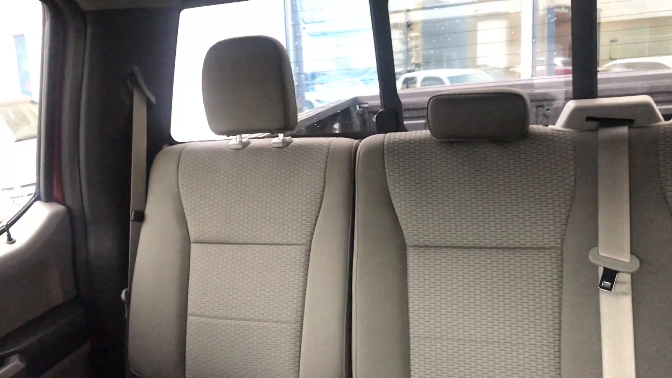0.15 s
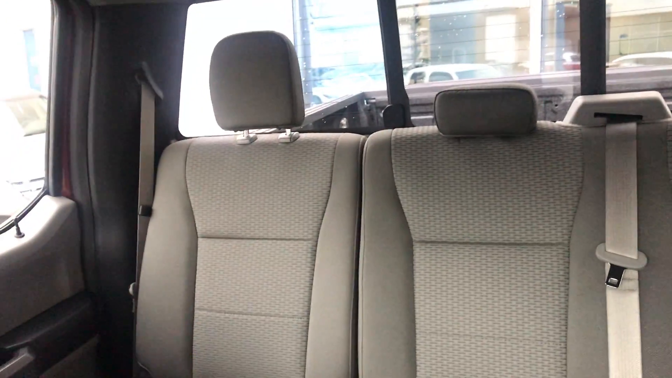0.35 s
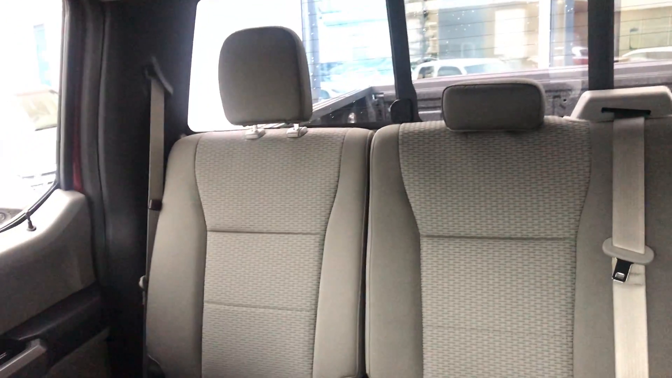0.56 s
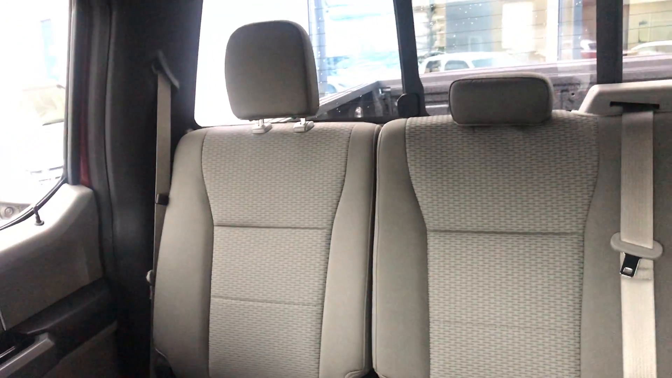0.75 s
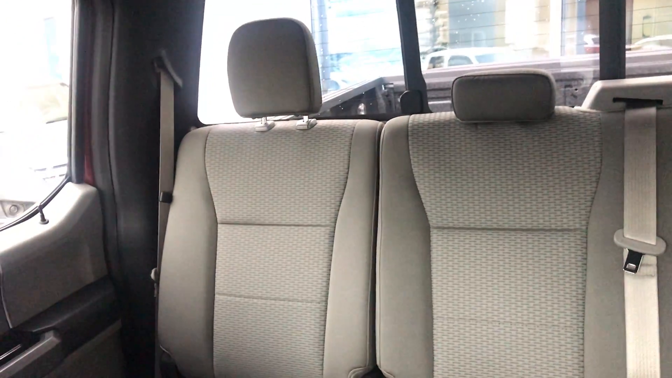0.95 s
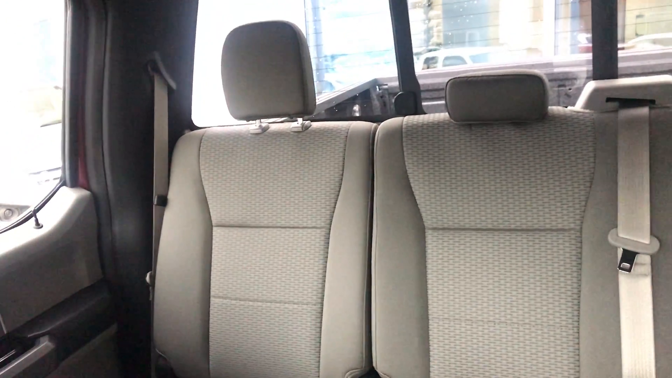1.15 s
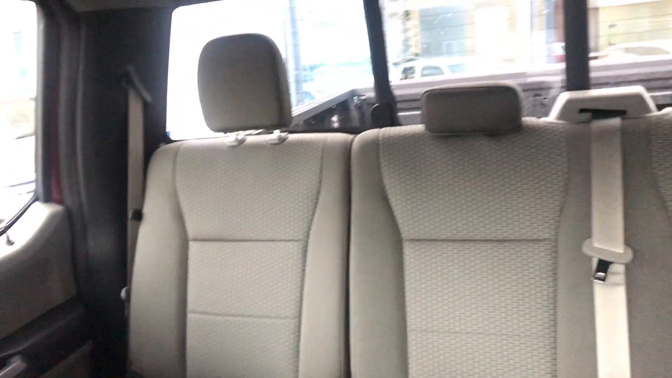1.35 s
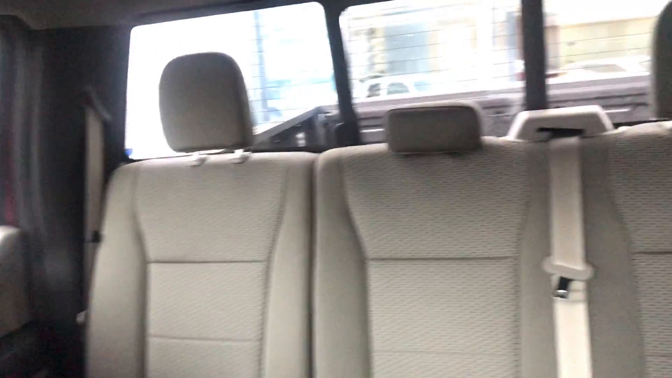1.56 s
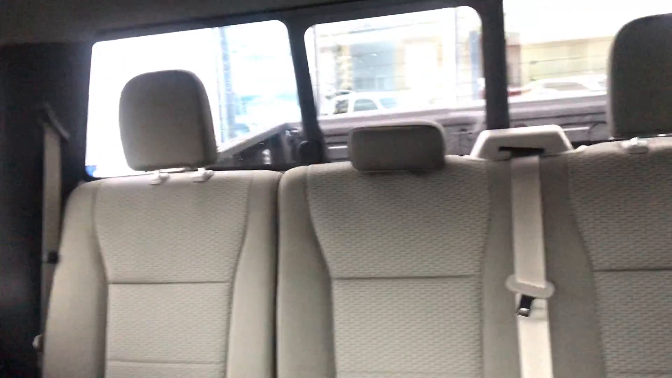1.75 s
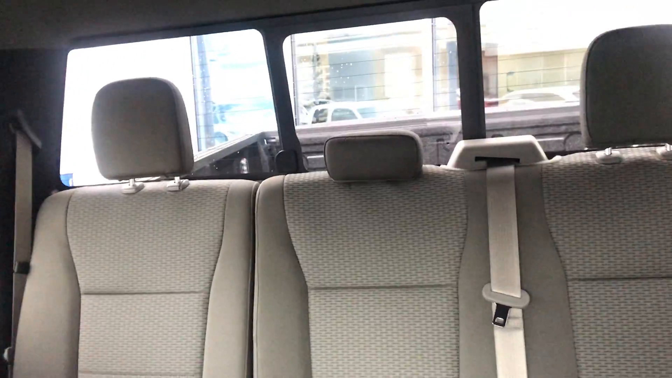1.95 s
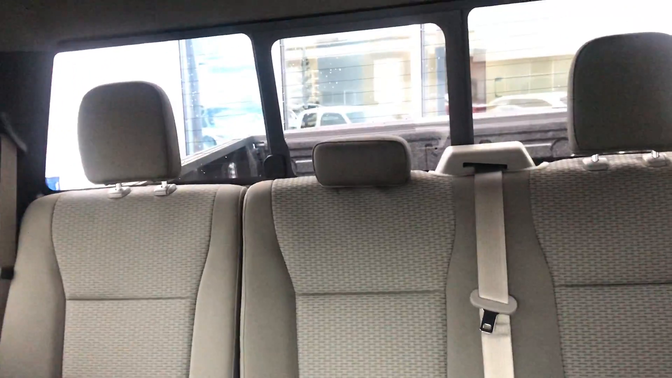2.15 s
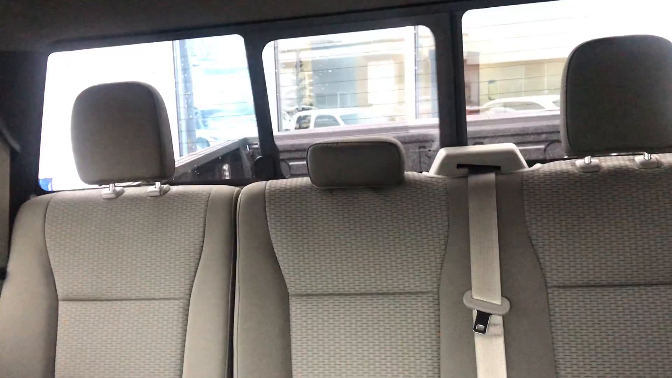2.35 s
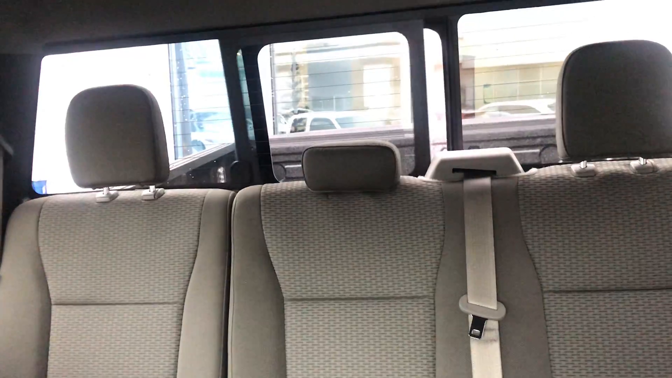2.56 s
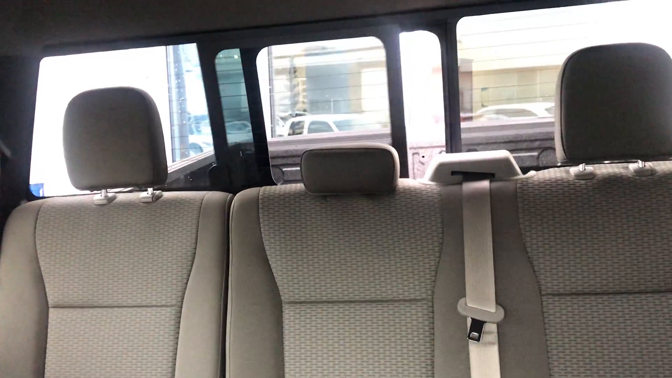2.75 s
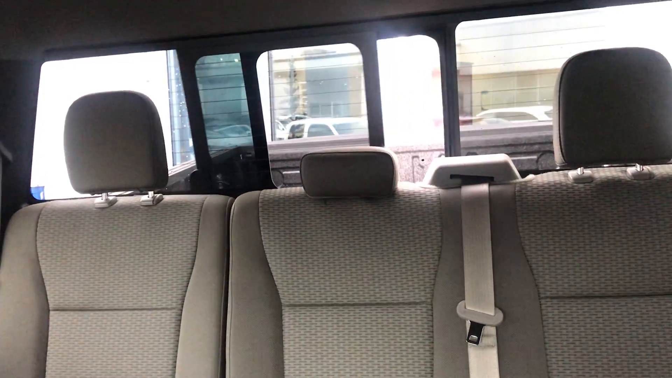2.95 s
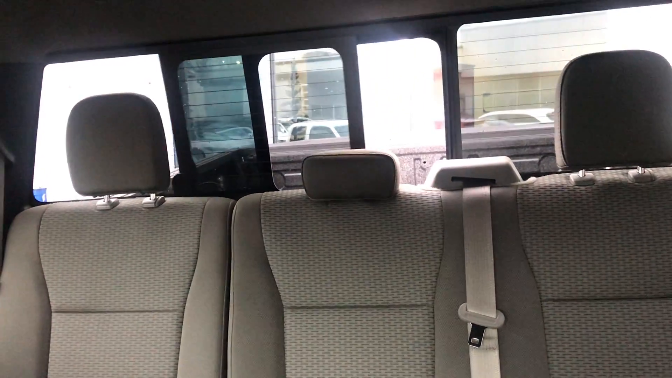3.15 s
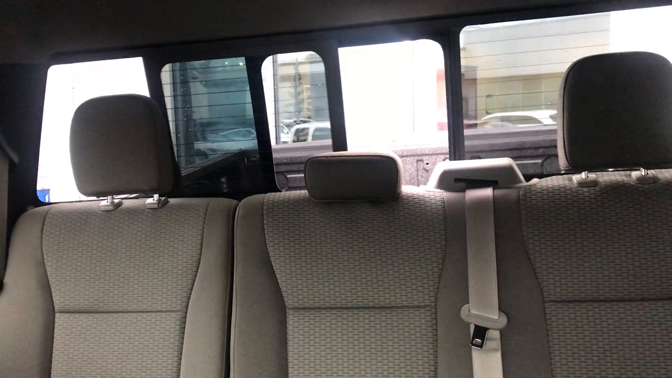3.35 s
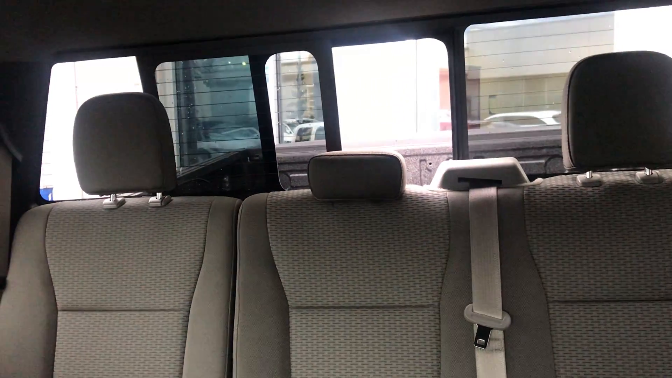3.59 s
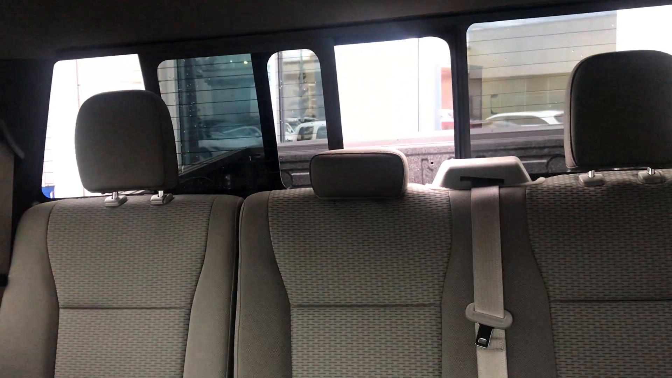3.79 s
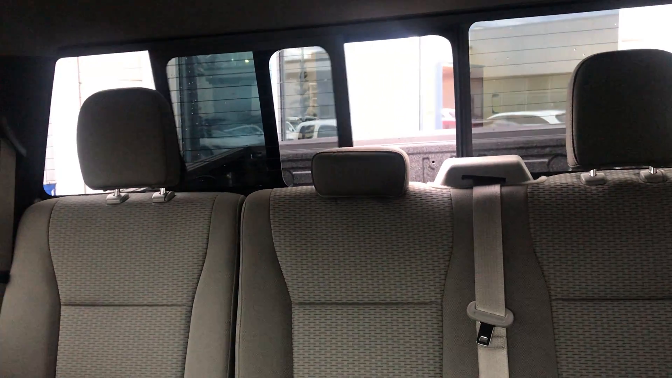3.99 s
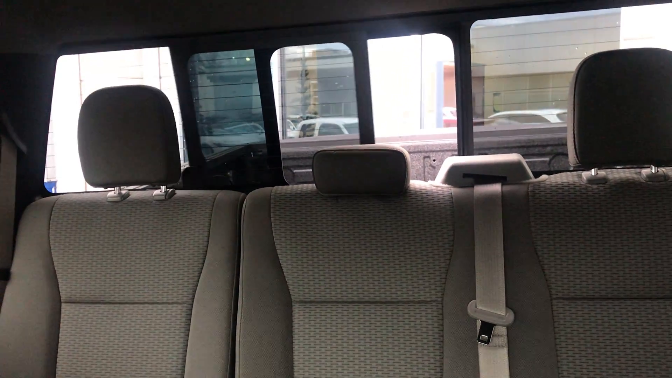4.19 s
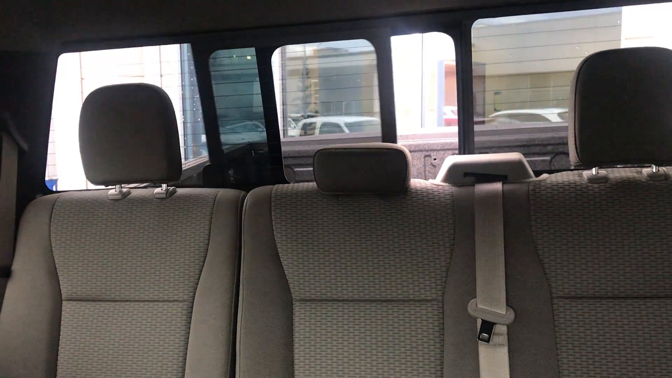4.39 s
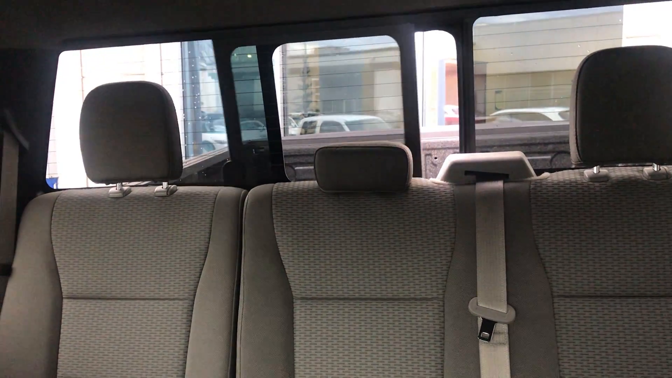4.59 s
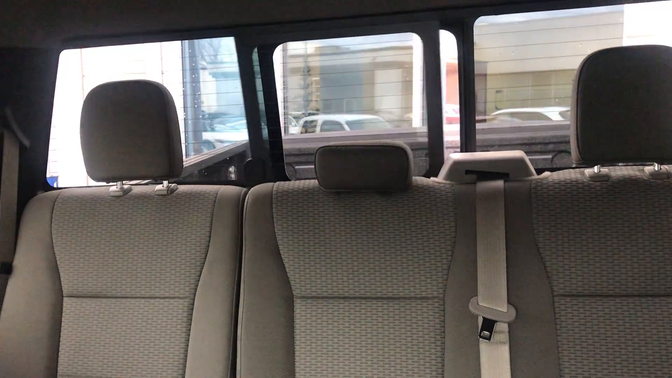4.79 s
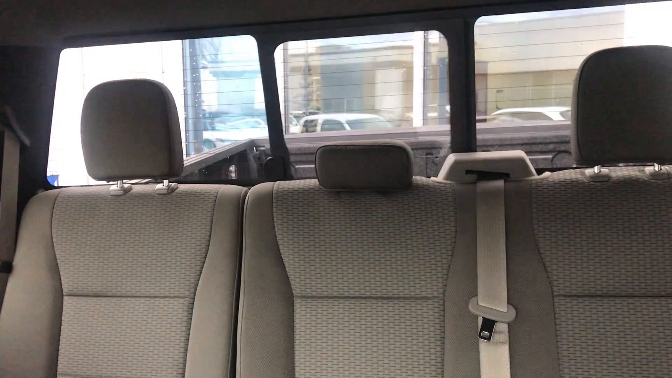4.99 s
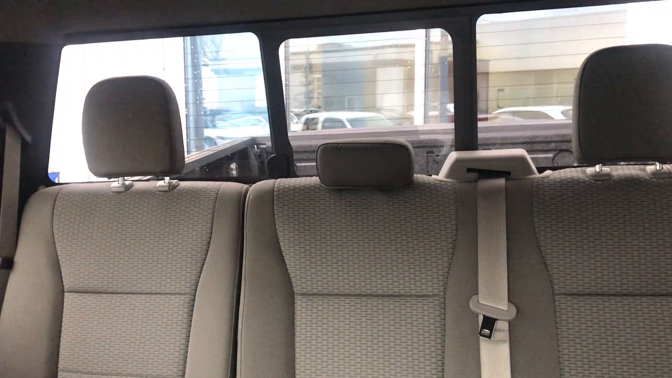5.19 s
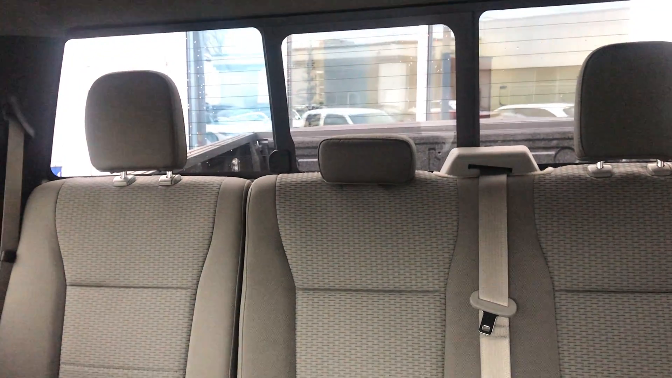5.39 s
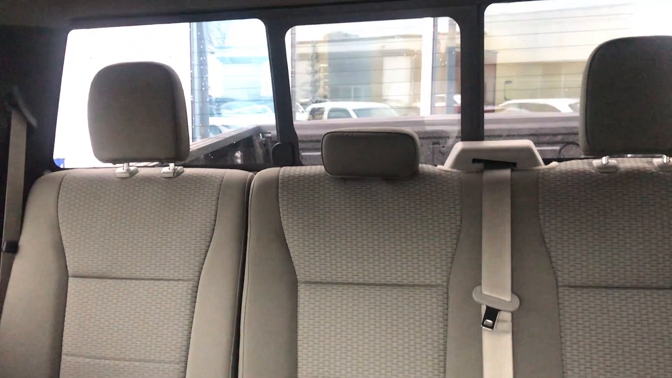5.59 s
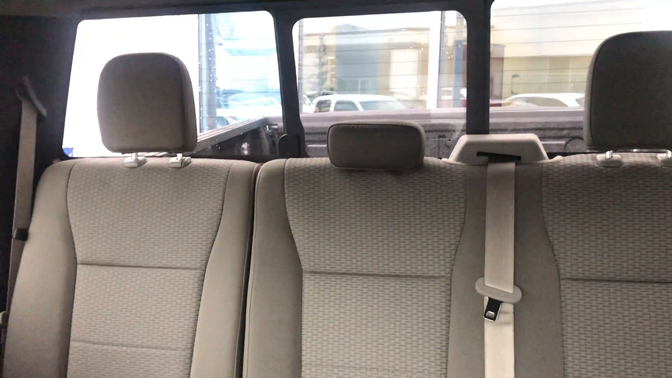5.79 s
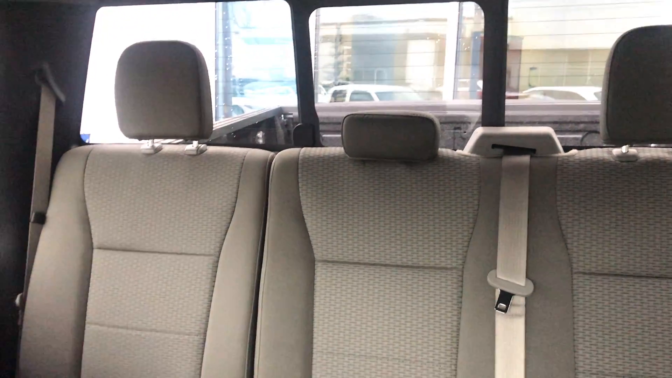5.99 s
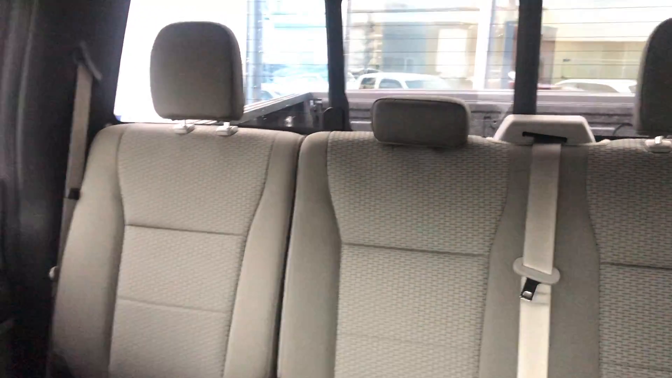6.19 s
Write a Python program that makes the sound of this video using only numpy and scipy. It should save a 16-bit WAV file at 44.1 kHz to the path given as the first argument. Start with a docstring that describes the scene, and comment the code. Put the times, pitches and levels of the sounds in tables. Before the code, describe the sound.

The closed cabin of a parked truck is quiet, with a muffled low rumble, a wavering deep hum and very soft hiss. At about 0.3 s plastic scuffs briefly with soft bumps; small dull ticks follow near 0.4, 1.15 and 2.2 s. At 2.4 s a clunk takes up the drive's slack, and the rear window slides open: a low motor hum wavers beneath a dense, dry rub of glass on rubber, with a sharp catch at once, another near 2.9 s and tiny faint squeaks. It stops at 3.5 s, leaving slightly airier hiss. Light knocks at 3.9 s and a clunk at 4.0 s start the closing run; the motor begins lower and speeds up as the rubbing grows. At 5.1 s the pane hits its frame, the loudest event, a crack and boomy thud with a small rebound. Quiet rumble remains, with a dull tick near 5.5 s and a faint swell of hiss around 6 s.

```python
"""Inside the quiet cabin of a parked truck, its powered rear window slides open, rests and slides shut.
A small motor hums as harmonics of its shaft rate, while dense tiny slips make the rub of glass along its seals.
The drive takes up its slack with a clunk at each start, and the pane meets the frame with a thud: noise cracks
ringing pane and frame, with pushes that boom the back wall. A switch scuffs first; a low rumble, soft hiss
and a few small ticks lie beneath. A phone's microphone hears it all."""
import sys
import numpy as np
from scipy import signal
from scipy.fft import rfft, irfft
from scipy.io import wavfile
from scipy.ndimage import uniform_filter1d

SR = 44100
rng = np.random.default_rng(int(sys.argv[2]) if len(sys.argv) > 2 else 0)


def to_wav(s):
    """Save 16-bit WAV."""
    ch = np.atleast_2d(s).T  # columns
    pcm = np.round(np.clip(ch, -1, 1) * 32767)  # PCM
    wavfile.write(sys.argv[1], SR, pcm.astype(np.int16))


N = 275184
T = np.arange(N) / SR


def undb(db):
    """Decibels to gain."""
    return 10 ** (np.asarray(db) / 20)


def unit(x):
    """Scale to rms 1."""
    return x / np.sqrt(np.mean(x ** 2))


def curve(rows, column=1):
    """One column of a table, joined by straight lines in time."""
    rows = np.array(rows)
    return np.interp(T, rows[:, 0], rows[:, column])


def during(start, stop, fade):
    """A gate that opens within a few milliseconds and dies away after the stop."""
    return np.clip((T - start) / 0.0043, 0, 1) * np.exp(-np.maximum(T - stop, 0) / fade)


def swell(start, attack, hold, decay):
    """An envelope that rises, holds and dies away."""
    rise = np.clip((T - start) / attack, 0, 1)
    return rise * np.exp(-np.maximum(T - start - attack - hold, 0) / decay)


def walk(rate):
    """A smooth random wander of rms 1, with a new target `rate` times per second."""
    k = int(SR / rate)
    steps = np.repeat(rng.standard_normal(N // k + 1), k)
    return unit(uniform_filter1d(uniform_filter1d(steps, k), k)[:N])


def colour(x, points):
    """Causal minimum-phase filter with the spectrum of a (pitch_hz, level_db) table."""
    hz, db = np.transpose(points)
    size = 8192
    f = np.maximum(np.fft.rfftfreq(size, 1 / SR), 1)
    cepstrum = irfft(np.log(undb(np.interp(np.log(f), np.log(hz), db))))
    # fold the cepstrum forward in time, so that nothing sounds early
    cepstrum[1:size // 2] *= 2
    cepstrum[size // 2 + 1:] = 0
    return signal.fftconvolve(x, irfft(np.exp(rfft(cepstrum))))[:len(x)]


def cut(x, hz, kind, order=2):
    """Low-pass or high-pass."""
    return signal.sosfilt(signal.butter(order, min(hz, .45 * SR), kind, fs=SR, output="sos"), x)


def ring(x, modes):
    """The sum of (pitch_hz, width_hz, level_db) resonances, all excited by x."""
    out = 0
    for hz, width, db in modes:
        b, a = signal.iirpeak(hz, hz / width, SR)
        out = out + undb(db) * signal.lfilter(b, a, x + 1e-18)
    return out


def grains(rate, spread_db):
    """Tiny slips at random moments, `rate` per second on average, of uneven size."""
    struck = rng.random(N) < rate / SR
    sizes = rng.standard_normal(N) * undb(spread_db * rng.standard_normal(N))
    return unit(struck * sizes)


def add(out, s, x):
    """Mix a short sound in at time s."""
    i = int(s * SR)
    out[i:i + len(x)] += x[:N - i]


def reflect(x, share, drift_s, count=8):
    """Echoes off roof and glass; their paths shift as the pane slides, so the peaks they make wander."""
    out = x.copy()
    for lag in rng.uniform(.001, .008, count):
        echo = np.interp(T - lag - drift_s * walk(1.434), T, x)
        out += share * rng.choice([-1, 1]) * echo
    return out


# Resonances of pane and frame: pitch_hz, width_hz, level_db
PANE_MODES = [(380, 72, -3), (560, 27, -2), (1260, 70, -10), (1430, 100, -9), (1615, 52, 3.5),
              (2280, 54, -14), (2770, 87, -10), (3620, 66, -19), (4100, 90, -24), (5000, 140, 6),
              (6260, 110, -7)]


def blows(rows, spectrum, pane_share):
    """Each contact is a crack, smeared by the close cabin walls, that rings pane and frame."""
    out, t = np.zeros(N), T[:SR // 3]
    for s, db, dull_hz, t60 in rows:
        crack = rng.choice([-1., 1.], len(t)) * np.exp(-np.log(1000) * t / t60)
        ringing = crack + pane_share * ring(crack, PANE_MODES)
        sound = cut(colour(ringing, spectrum), dull_hz, "low")
        # the level is that of the first 10 ms
        add(out, s, undb(db) * sound / np.std(sound[:SR // 100]))
    return out


# Resonances of the cab's back wall: pitch_hz, level_db, t60_s
WALL_MODES = [(72, -26, 0.05), (105, 3, 0.14), (124.6, -4, 0.21), (173, 3.5, 0.1), (196.2, 2.5, 0.13),
              (249, -12, 0.065), (297, 11, 0.067)]


def thumps(rows):
    """A push and its recoil set the back wall booming; a slower push sounds deeper."""
    out, t = np.zeros(N), T[:SR // 2]
    wall = 0
    for hz, db, t60 in WALL_MODES:
        wall = wall + undb(db) * np.cos(2 * np.pi * hz * t) * np.exp(-np.log(1000) * t / t60)
    for s, db, hz in rows:
        push = -np.sin(2 * np.pi * np.minimum(t * hz, 1))
        boom = signal.fftconvolve(wall, push)[:len(t)]
        # the level is that of the first 20 ms
        add(out, s, undb(db) * boom / np.std(boom[:SR // 50]))
    return out


# Spectrum of the resting cabin: pitch_hz, level_db (per Hz)
CABIN_SPECTRUM = [(20, -28.5), (36, -13), (54, -1), (70, -6.5), (100, -10), (215, -12), (260, -19),
                  (420, -27), (650, -33.5), (1150, -34.5), (1800, -51), (4500, -71), (9000, -56),
                  (15800, -57.5)]
RUMBLE_DB, DRONE_HZ, DRONE_DB = -51, 55.2, -55


def cabin_rumble():
    """Muffled noise with a low hum that wavers in pitch and level."""
    rumble = unit(colour(rng.standard_normal(N), CABIN_SPECTRUM)) * undb(RUMBLE_DB + walk(2.845))
    turns = 2 * np.pi * np.cumsum(DRONE_HZ + 2.38 * walk(9)) / SR
    return rumble + np.sin(turns) * undb(DRONE_DB + 1.6 * walk(10))


# Spectrum of the air hiss: pitch_hz, level_db (per Hz)
AIR_SPECTRUM = [(500, -2.5), (1500, 6), (3300, 3), (4500, 1.5), (5000, -1), (6300, 0.5), (7500, -4),
                (12000, -6), (15800, -8)]
# Soft swells of hiss: middle_s, half_length_s, level_db
HISS_SWELLS = [(.5, 0.98, -76), (1.65, 0.4, -72), (6.084, 0.19, -70)]
HISS_SHUT_DB, HISS_OPEN_DB = -76, -70.5  # steady hiss; what the fully open window adds
OUTSIDE_TOP_HZ = 6200


def air():
    """Soft hiss that swells a few times, and duller outside air that grows as the window opens."""
    power = undb(HISS_SHUT_DB) ** 2
    for s, half, db in HISS_SWELLS:
        power = power + undb(db) ** 2 * np.exp(-((T - s) / half) ** 2)
    hiss = unit(colour(rng.standard_normal(N), AIR_SPECTRUM)) * np.sqrt(power) * undb(0.5 * walk(14))
    turning_points = [s for travel in TRAVELS for s in travel[:2]]
    opening = np.interp(T, turning_points, [0, 1, 1, 0])
    outside = colour(rng.standard_normal(N), AIR_SPECTRUM)
    outside = unit(cut(outside, OUTSIDE_TOP_HZ, "low", order=4))
    return hiss + outside * undb(HISS_OPEN_DB) * np.sqrt(opening)


# Small ticks of trim and seats: start_s, level_db, dull_above_hz, t60_s
TICK_EVENTS = [(0.294, -56, 9000, .03), (0.4225, -54.5, 1700, 0.055), (0.835, -64.5, 3500, 0.057),
               (1.1475, -49, 1180, 0.08), (1.157, -63, 3500, 0.086), (1.806, -58.5, 5000, 0.12),
               (1.96, -58, 900, 0.39), (2.19, -50.5, 440, 0.073), (5.493, -49.5, 546, 0.09),
               (5.5735, -61, 2750, 0.01)]
# Spectrum of soft trim: pitch_hz, level_db (per Hz)
TRIM_SPECTRUM = [(80, -0.5), (250, 5), (520, 3), (750, -5), (1200, -1), (2000, -9.5), (3500, -6.5),
                 (6000, -12), (15000, -16)]


def ticks():
    """Small contacts of soft trim and seats, which ring the pane only a little."""
    return blows(TICK_EVENTS, TRIM_SPECTRUM, pane_share=0.18)


# Soft bumps on the cab's back wall: start_s, level_db, push_hz (strongest near)
WALL_BUMPS = [(0.296, -41.5, 60.7), (0.339, -41, 59.3), (0.382, -47.5, 177), (1.150, -51.5, 166),
              (3.918, -40.5, 162), (4.060, -39, 84), (5.162, -41.5, 164)]


def bumps():
    """Soft pushes that boom the back wall."""
    return thumps(WALL_BUMPS)


# Resonances of the switch's plastic: pitch_hz, width_hz, level_db
SWITCH_MODES = [(370, 53, 7.5), (620, 180, 3), (880, 140, 1.5), (1171, 51, 8), (1720, 400, -5),
                (2070, 27, 5), (2470, 200, -14), (3520, 410, -14), (5270, 290, -9), (6130, 87, 4.5)]
SCUFF_S, SCUFF_DB = 0.2843, -46.5  # the level is before the envelope
SCUFF_ATTACK_S, SCUFF_HOLD_S, SCUFF_T60_S = 0.017, 0.021, 0.097


def switch():
    """Plastic rubs on plastic for a moment: dense slips ring the switch."""
    slips = grains(5000, 2.5)
    sound = cut(ring(slips, SWITCH_MODES), 5400, "low", order=6) + .05 * cut(slips, 16000, "low")
    envelope = swell(SCUFF_S, SCUFF_ATTACK_S, SCUFF_HOLD_S, SCUFF_T60_S / np.log(1000))
    return unit(sound) * undb(SCUFF_DB) * envelope


# Lighter knocks of slack and play in the drive: start_s, level_db, dull_above_hz, t60_s
KNOCK_EVENTS = [(2.340, -61, 5000, 0.062), (2.351, -51.5, 700, 0.13), (2.505, -53.5, 5000, 0.02),
                (2.536, -50, 4000, 0.015), (2.988, -46.5, 940, 0.018), (3.9115, -50.5, 900, 0.068),
                (3.9535, -54, 5000, 0.1), (4.071, -46, 900, 0.039), (4.097, -47.5, 1000, 0.046)]
# Spectrum of a hard contact, also used by the clunks: pitch_hz, level_db (per Hz)
CONTACT_SPECTRUM = [(80, -41), (250, 13.5), (400, 8), (560, 7), (720, -2), (1000, -3), (1400, 2), (1650, 4),
                    (1950, 2.5), (3000, 3), (6000, -6), (10000, -4), (15000, -11)]


def knocks():
    """Slack and play in the drive knock hard parts together, ringing pane and frame."""
    return blows(KNOCK_EVENTS, CONTACT_SPECTRUM, pane_share=.9)


SQUEAKS_PER_S, SQUEAK_S = 45, 0.058
SQUEAK_DB, SQUEAK_RANGE_DB = -64.5, 3  # quietest peak level; how far above it the loudest may reach
SQUEAK_LOW_HZ, SQUEAK_HIGH_HZ, SQUEAK_JITTER = 1346, 5485, 0.0132  # jitter: rms share of the pitch


def squeaks(start, stop):
    """Here and there the sliding glass rings for an instant, each time at another unsteady pitch."""
    out, shape = np.zeros(N), np.hanning(int(SQUEAK_S * SR))
    wobble = SQUEAK_JITTER * walk(300)
    for when, pitch, size in rng.random((int(SQUEAKS_PER_S * (stop - start)), 3)):
        s = start + when * (stop - start - SQUEAK_S)
        hz = SQUEAK_LOW_HZ * (SQUEAK_HIGH_HZ / SQUEAK_LOW_HZ) ** pitch
        hz = hz * (1 + wobble[int(s * SR):][:len(shape)])
        tone = np.sin(2 * np.pi * np.cumsum(hz) / SR)
        add(out, s, undb(SQUEAK_DB + SQUEAK_RANGE_DB * size) * shape * tone)
    return out


# The glass catches in its seals; the seals play this table too:
# start_s, easing_s, extra_rub_db, extra_hiss_db, sing_pitch_hz, sing_level_db
SEAL_CATCHES = [(2.431, 0.02, 8, 7.5, 3950, -51), (2.897, 0.14, 5, 5.5, 2200, -55),
                (3.351, 0.15, -1, 2, 2650, -59.5), (4.40, .12, 1.5, 4, 3200, -57),
                (4.621, 0.03, 1.5, -1.5, 2270, -51.5), (5.038, 0.025, 6, 12.5, 4090, -59)]
CATCH_RISE_S, SING_WIDTH_HZ = 0.0049, 490


def sings():
    """Where the glass catches, friction feeds one resonance of the pane in broken bursts."""
    out = np.zeros(N)
    for s, easing, _, _, hz, db in SEAL_CATCHES:
        mode = [(hz, SING_WIDTH_HZ, 0)]
        tone = ring(ring(grains(2500, 2), mode), mode) * undb(2 * walk(70))
        out += unit(tone) * undb(db) * swell(s, CATCH_RISE_S, 0, easing)
    return out


# Spectrum of the rubbing: pitch_hz, level_db (per Hz)
SEAL_SPECTRUM = [(150, 17.5), (300, 10.5), (600, 3.5), (1000, 0.5), (1900, -1.5), (3200, 0.5), (4400, -2),
                 (4750, -5.5), (5300, -4), (7500, -12), (9800, -13.5), (12500, -13.5), (14000, -15.5),
                 (15800, -19)]
SCRAPE_DB, BODY_DB, HISS_DB = -2, -1, -8  # low, middle and fine part, relative to the rubbing level


def seals(start, stop, run_out, rub_db, db_per_s):
    """Dense stick and slip of glass on rubber and flock, with specks of grit, ringing the pane a little."""
    grit = .3 * grains(150, 2)
    slips = grains(12000, 1.2) * undb(0.74 * walk(60)) + grit
    rubbing = colour(slips + 0.15 * ring(slips, PANE_MODES), SEAL_SPECTRUM)
    rubbing = reflect(rubbing, share=0.13, drift_s=.00009)
    scrape = cut(cut(rubbing, 1480, "low", order=4), 147, "high")
    scrape = unit(scrape) * undb(SCRAPE_DB + 2.14 * walk(25))
    body = cut(cut(rubbing, 1170, "high", order=4), 6450, "low", order=6)
    body = unit(body) * undb(BODY_DB + .6 * walk(15))
    flock = reflect(colour(grains(14000, 1.5), SEAL_SPECTRUM), share=.14, drift_s=.00003)
    hiss = unit(cut(flock, 6470, "high", order=6)) * undb(HISS_DB + 0.98 * walk(14))
    for s, easing, extra_db, extra_hiss_db, _, _ in SEAL_CATCHES:
        grip = swell(s, CATCH_RISE_S, 0, easing)
        scrape = scrape * undb(0.62 * extra_db * grip)  # the low part changes less
        body = body * undb(extra_db * grip)
        hiss = hiss * undb(extra_hiss_db * grip)
    level = undb(rub_db + db_per_s * (T - start))
    return (scrape + body + hiss) * level * during(start, stop, run_out)


# Harmonics of the motor: shaft_multiple, level_db (relative to the hum), waver_db
HUM_ORDERS = [(1, 3, 1.3), (3, -21, 7), (4, -27.5, 5.5), (5, -41, 9), (6, -45.5, 14.5)]
COAST_S, COAST_HZ_PER_S = 0.015, 400  # the motor runs down once the current is cut
WALL_OCTAVE_HZ, WALL_OCTAVE_WIDTH_HZ = 194, 55  # the wall resonance that carries the motor's overtone


def motor(run, start, stop, octave_db):
    """Orders of the shaft rate, which sags and recovers with the drag on the glass and falls as the motor coasts."""
    hz = np.maximum(curve(run) - COAST_HZ_PER_S * np.maximum(T - stop, 0), 0)
    turns = 2 * np.pi * np.cumsum(hz * (1 + 0.00614 * walk(30))) / SR
    hum = 0
    for k, db, waver in HUM_ORDERS:
        hum = hum + undb(db + waver * walk(27)) * np.sin(round(k) * turns)
    hum = hum * undb(curve(run, column=2))
    overtone = undb(octave_db + 3.2 * walk(15)) * np.sin(2 * turns + 0.93 * walk(25))
    overtone = ring(overtone, [(WALL_OCTAVE_HZ, WALL_OCTAVE_WIDTH_HZ, 0)])
    return (hum + overtone) * during(start, stop, COAST_S)


CRACK_HZ, CRACK_T60_S = 6400, 0.043  # first touch: dull above, decay
BLOW_HZ, BLOW_T60_S = 1550, 0.057  # the weight of the pane behind it
REBOUND_S, REBOUND_HZ, REBOUND_T60_S = .042, 2290, 0.083
JOLT_DB, JOLT_HZ, BOOM_LAG_S = -36.5, 163, 0.0174  # the wall is jolted, then swings back with a boom
# The drive takes up the pane, twice, and the pane meets the frame:
# start_s, crack_level_db, blow_lag_s, blow_level_db, boom_level_db, boom_hz (strongest near), rebound_level_db
WINDOW_CLUNKS = [(2.3795, -43, 0.0068, -39.5, -32.5, 92, -50), (3.9862, -45.5, .0105, -42.5, -32, 166, -61),
                 (5.0895, -37, .0043, -30, -29, 121, -50.5)]


def clunks():
    """A bright first touch, the duller blow of the pane's weight, the wall's boom and a small rebound."""
    out = np.zeros(N)
    for s, crack_db, lag, blow_db, boom_db, boom_hz, rebound_db in WINDOW_CLUNKS:
        contacts = [(s, crack_db, CRACK_HZ, CRACK_T60_S),
                    (s + lag, blow_db, BLOW_HZ, BLOW_T60_S),
                    (s + REBOUND_S, rebound_db, REBOUND_HZ, REBOUND_T60_S)]
        shoves = [(s + lag / 2, JOLT_DB, JOLT_HZ), (s + lag + BOOM_LAG_S, boom_db, boom_hz)]
        out += blows(contacts, CONTACT_SPECTRUM, pane_share=1.0) + thumps(shoves)
    return out


# The window opening, then closing; the outside air follows this table too:
# start_s, stop_s, run_out_s, rub_level_db, rub_change_db_per_s, motor_octave_level_db (before the wall resonance)
TRAVELS = [(2.373, 3.52, 0.014, -54.5, -0.65, -54), (3.987, 5.1, 0.0031, -54, 2, -50)]
# The motor in each travel: time_s, shaft_rate_hz, hum_level_db
MOTOR_RUNS = [
    [(2.47, 92.6, -49.5), (2.61, 94, -48.5), (2.82, 97.5, -38.5), (3.008, 96.6, -48), (3.128, 102.4, -55),
     (3.224, 103.5, -40), (3.32, 102, -55.5), (3.426, 96.7, -45.5), (3.52, 99.5, -45)],
    [(4.14, 85.3, -51), (4.222, 88.1, -44), (4.326, 87.7, -46.5), (4.414, 99.7, -52), (4.556, 102.5, -46),
     (4.624, 100, -55), (4.724, 106.6, -42), (4.774, 108, -45), (5.06, 106.7, -42)],
]


def scene():
    """Both travels of the window, with their clunks and knocks, in the cabin."""
    background = cabin_rumble() + air() + ticks() + bumps() + switch()
    window = knocks() + sings() + clunks()
    for run, (start, stop, run_out, rub_db, db_per_s, octave_db) in zip(MOTOR_RUNS, TRAVELS):
        window += squeaks(start, stop)
        window += seals(start, stop, run_out, rub_db, db_per_s)
        window += motor(run, start, stop, octave_db)
    return (background + window)[None]


TOP_HZ = 15780


def record(dry):
    """The phone's microphone has a narrow dip in the treble and cuts the top."""
    heard = dry - 0.6 * ring(dry, [(10470, 500, 0)])
    return signal.sosfilt(signal.ellip(10, .2, 70, TOP_HZ, fs=SR, output="sos"), heard)


dry = scene()
out = record(dry)
to_wav(out)
```